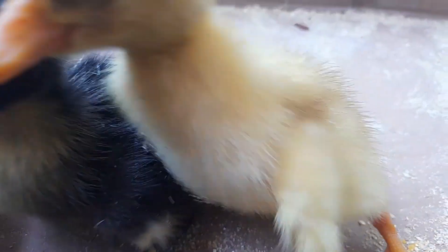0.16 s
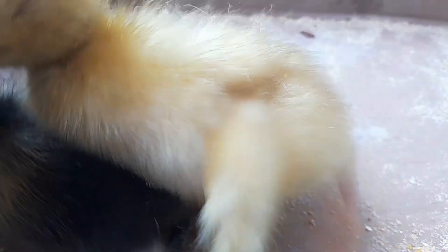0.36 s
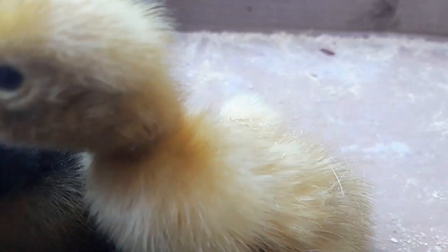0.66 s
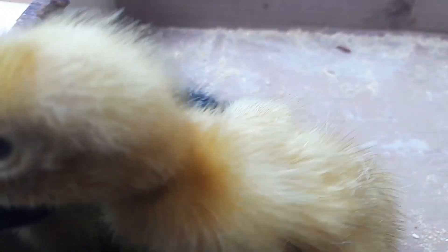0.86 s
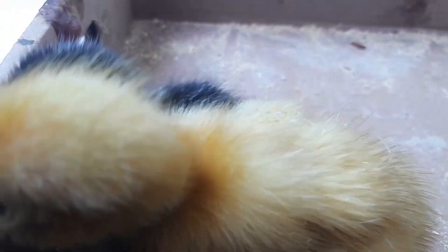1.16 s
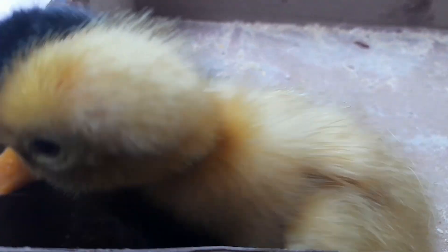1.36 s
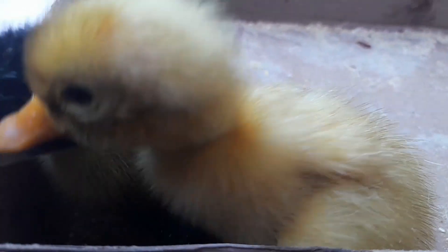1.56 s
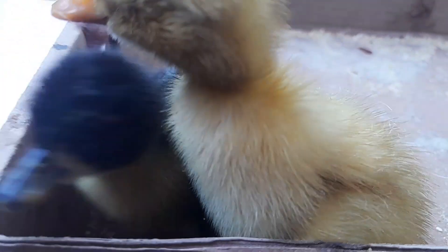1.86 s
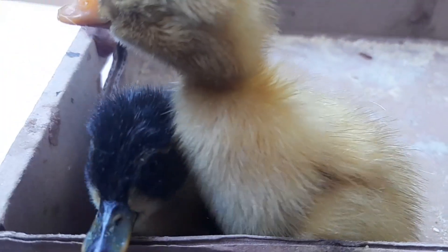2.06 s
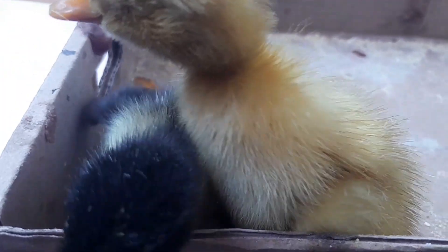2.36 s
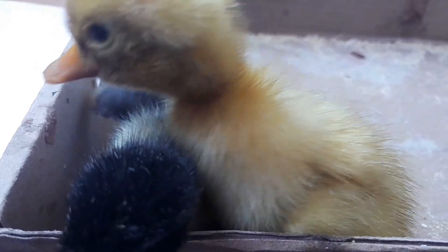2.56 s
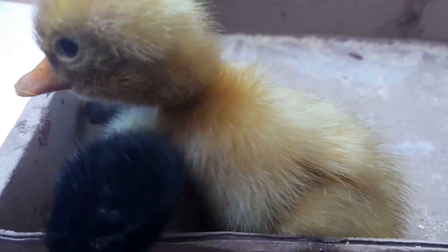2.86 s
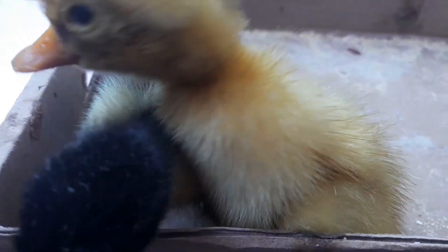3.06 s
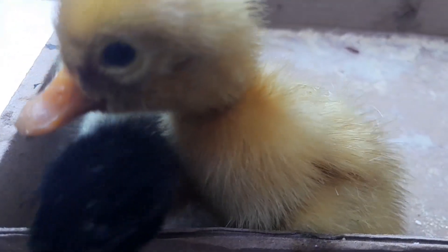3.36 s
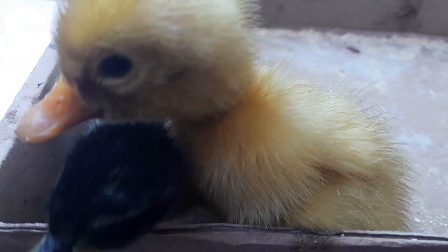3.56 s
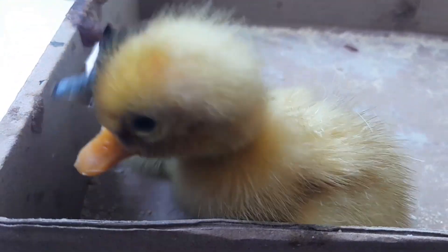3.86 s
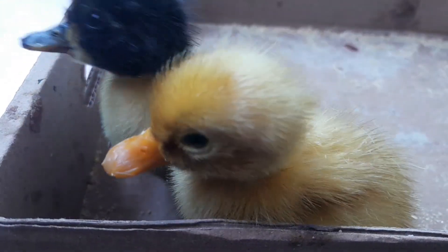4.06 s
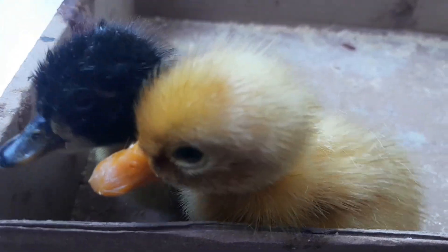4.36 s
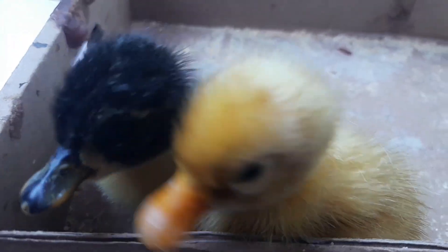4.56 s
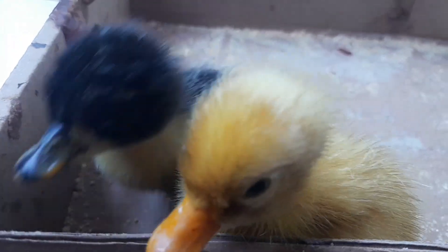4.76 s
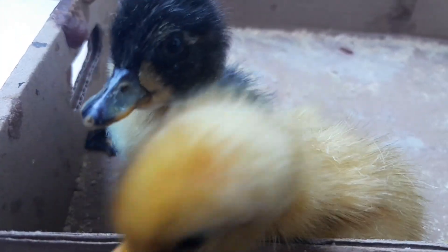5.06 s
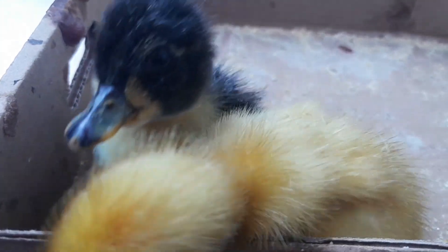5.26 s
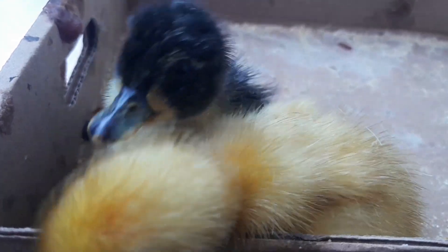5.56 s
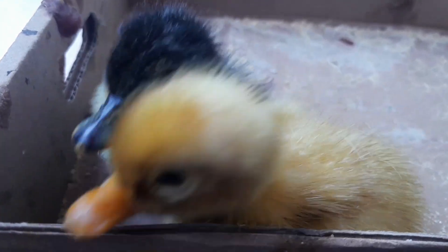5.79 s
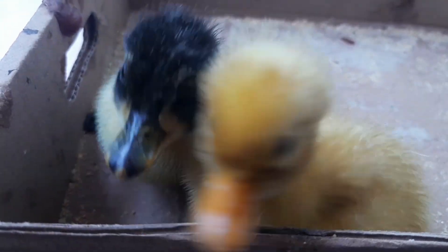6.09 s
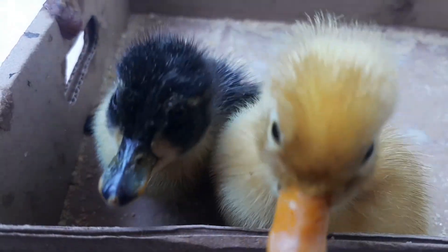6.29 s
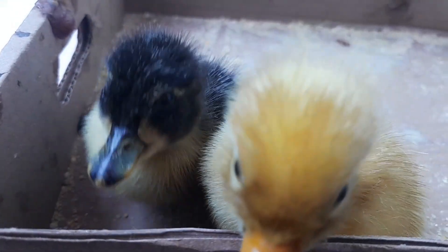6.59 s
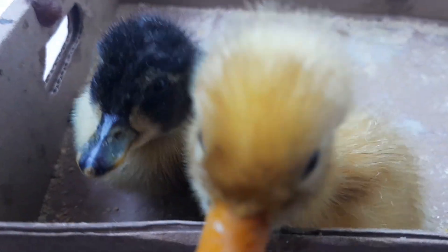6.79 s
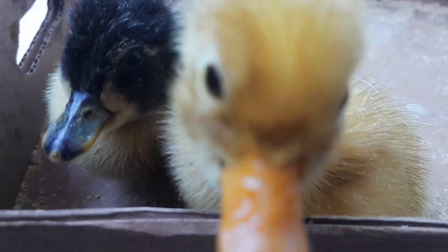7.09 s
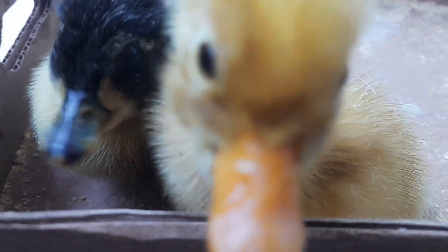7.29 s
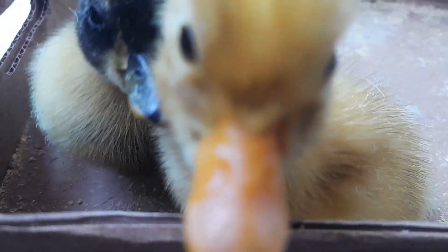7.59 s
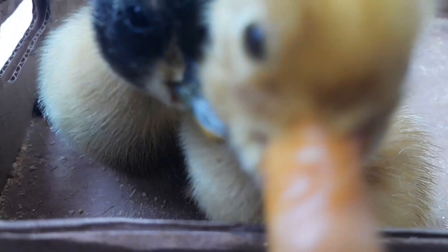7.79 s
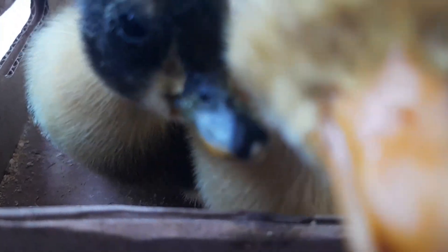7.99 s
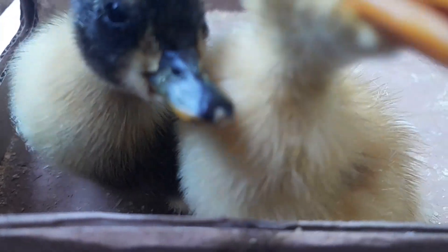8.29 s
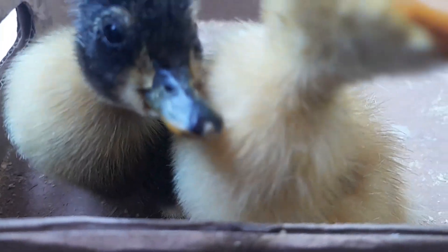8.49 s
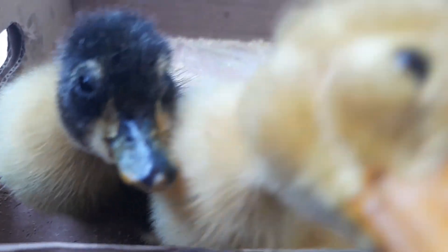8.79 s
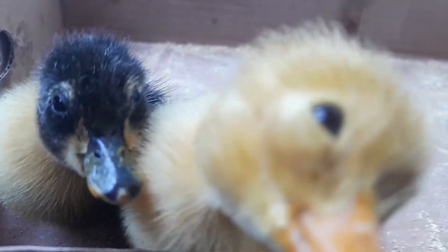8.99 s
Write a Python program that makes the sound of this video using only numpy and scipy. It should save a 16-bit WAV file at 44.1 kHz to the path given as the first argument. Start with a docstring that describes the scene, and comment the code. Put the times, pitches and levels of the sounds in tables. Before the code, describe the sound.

One sharp duckling peep, faint scuffs and taps on cardboard with a few soft peeps, then six loud peeps in a row.

```python
"""Two ducklings in a cardboard box, close to the left microphone, in a small, faintly humming room.
First comes one loud peep: the syrinx oscillates in a nearly pure tone while turbulent air adds a rasp.
For the next six seconds feet and down scuff the cardboard by friction, footfalls excite the modes of
the floor, and a few soft peeps sound, mostly falling. From 6.7 s a run of six loud, raspy peeps ends
the scene. Each call is followed by early reflections from the box walls, then by the room's decay."""
import sys
import numpy as np
from scipy import signal
from scipy.fft import rfft, irfft, next_fast_len
from scipy.io import wavfile
from scipy.ndimage import uniform_filter1d, minimum_filter1d, map_coordinates

SR = 44100
rng = np.random.default_rng(int(sys.argv[2]) if len(sys.argv) > 2 else 0)


def wrap_up_sound(samples):
    """Save the sound to the file named by the first command line argument, as 16-bit audio."""
    columns = np.atleast_2d(samples).T
    # keep every value between -1 and 1, then stretch to whole-number steps
    tamed = np.clip(columns, -1, 1)
    steps = np.round(tamed * 32767).astype(np.int16)
    wavfile.write(sys.argv[1], SR, steps)


N = 403074

# Levels in the tables are relative; each source adds its own gain.
# envelope of the room noise: time_s, level_db
AMBIENT_ENVELOPE = [(0, -71.5), (1.8, -65), (3.0, -65.5), (5.7, -64.5), (7.2, -66), (8.5, -74)]
# spectrum of the room's rumble: frequency_hz, density_db
RUMBLE_SPECTRUM = [(15, -54.5), (28, -21.5), (55, -5), (100, -2), (170, -1.5), (280, -7), (450, -7),
                   (640, -16), (750, -13.5), (1150, -23.5), (1600, -16), (2100, -31.5), (3200, -47),
                   (5000, -120)]
# steady tones in the room: frequency_hz, level_db
HUM_LINES = [(107.7, -72), (247.6, -68.5), (425.3, -69), (565.2, -73.5), (716.0, -77)]
# reverberation time of the room: frequency_hz, t60_s
ROOM_DECAY = [(200, 0.32), (5000, 0.19), (9000, 0.078), (15000, 0.051)]
# resonances of the box floor: frequency_hz, bandwidth_hz, level_db
FLOOR_MODES = [(91, 34, 2.5), (174.2, 5.7, 5.5), (263, 150, -2.5), (318.2, 97, 0.5), (473, 55, -9),
               (584, 220, -13), (770, 79, -7.5), (1020, 53, -8.5), (1562, 83, -12.5), (1990, 80, -8)]
# feet striking the floor: start_s, level_db, treble_limit_hz
FOOTFALLS = [(0.086, -60, 596), (.418, -49, 300), (0.464, -47, 250), (.519, -48, 400), (0.697, -50, 400),
             (.975, -47.5, 150), (1.048, -54, 500), (1.312, -39, 1170), (1.639, -49.5, 300),
             (1.912, -49, 400), (1.989, -45.5, 250), (2.14, -45.5, 600), (2.948, -47.5, 2500),
             (4.627, -38.5, 1500), (5.72, -47.5, 200), (7.289, -50, 900)]
# spectrum of friction on cardboard: frequency_hz, density_db
FRICTION_SPECTRUM = [(290, -33), (500, -8), (739, -0.5), (917, -7.5), (1010, -4.5), (1890, -5.5),
                     (2090, -4), (3470, -5), (3830, -8.5), (9390, -6), (11200, -10), (14700, -3),
                     (15800, -4)]
# down brushing the walls, busy at first and still at the end: time_s, level_db
SHUFFLE_ENVELOPE = [(.1, -56), (.34, -67.5), (1.4, -68), (1.8, -73), (2.55, -78), (3.02, -66.5),
                    (3.25, -73.5), (4.0, -75), (4.55, -68.5), (5.3, -71), (5.7, -68), (6.2, -81.5),
                    (6.7, -69.5), (7.9, -78), (8.55, -88)]
# feet sliding on the cardboard: crest_s, level_db, length_s, tilt_db_per_octave
SCUFF_STROKES = [(0.4, -38, .13, 3), (0.506, -39.5, 0.26, 0.5), (0.582, -47.5, 0.24, -1.5),
                 (0.893, -48.5, 0.097, -0.5), (1.047, -44, 0.12, 0.5), (1.29, -40.5, 0.28, 1.5),
                 (1.341, -38.5, 0.28, -0.5), (1.458, -45.5, 0.14, 0), (1.599, -47.5, 0.22, 0.5),
                 (1.706, -48.5, 0.16, 0), (1.896, -33.5, .13, 1.5), (1.955, -49, 0.23, -2),
                 (2.034, -38, 0.15, 0), (2.131, -33, 0.14, 1.5), (2.191, -41, 0.16, 0.5),
                 (2.359, -51.5, 0.15, -1), (2.719, -56, .25, 0), (2.894, -38, 0.25, 1),
                 (2.954, -45, 0.32, -2.5), (3.1, -41, 0.12, -1), (3.623, -53, 0.62, -0.5),
                 (3.802, -50, 0.32, -1), (3.911, -47.5, 0.092, 4.5), (4.128, -52, 0.14, -1.5),
                 (4.2, -47, 0.14, -0.5), (4.295, -50.5, 0.34, 0), (4.43, -46.5, 0.16, 0),
                 (4.62, -36, 0.22, 1.5), (4.666, -43.5, 0.29, -1.5), (4.763, -43, 0.12, 3.5),
                 (5.002, -53, 0.13, -2.5), (5.099, -56, .13, -1), (5.573, -48.5, 0.11, 2.5),
                 (5.627, -49.5, 0.073, 0), (5.756, -51.5, 0.15, -2), (6.058, -59, .12, 0.5)]
# quiet calls: start_s, length_s, pitch_hz, fall_octaves, level_db, roughness
SOFT_PEEPS = [(1.59, 0.084, 3570, 0.0053, -71, 0.5), (1.938, .076, 3660, 0.013, -71, 0.3),
              (2.997, 0.088, 4440, 0.3, -52, 0.37), (3.254, 0.062, 5150, -0.2, -70.5, .6),
              (3.284, 0.096, 4740, 0.25, -47, 0.4), (5.395, 0.15, 3600, .1, -72, 0.65),
              (5.927, .076, 3460, 0, -75, 0), (6.415, .12, 4850, .24, -42.5, .42)]
# course of a soft peep: length_share, fall_share, level_db, roughness_factor
SOFT_CONTOUR = [(0, 0.39, -34, 1.7), (.18, 0, -1.5, 0.69), (.32, .2, -1.5, 0.81), (.44, .65, 3, 0.47),
                (.58, 1.026, -1, 0.63), (.78, 1, 0, 1), (.88, 1.33, -7, 1.85), (1, 2.58, -29, 3.6)]
# spectrum of turbulent air in the throat and bill: frequency_hz, density_db
RASP_SPECTRUM = [(500, -45), (1100, -33), (1950, -17), (2700, -18.5), (3600, -16), (4600, -3.5),
                 (5500, -2.5), (6800, -5), (8500, -16.5), (10100, -11.5), (11500, -32), (13500, -19),
                 (15500, -15.5)]
# course of a loud peep: stage (0 start, 1 lock, 2 crack, 3 drop, 4 end), pitch_octaves, roughness_factor
LOUD_CONTOUR = [(0, -.6, 38), (.3, -.35, 30), (.48, .04, 2.4), (.93, .015, 1.6), (1.06, 0, .5),
                (1.95, 0, .65), (2.1, 0, 2.2), (3, 0, 2.4), (3.3, -.07, 9), (4, -.14, 24)]
# loud calls: start_s, lock_s, crest_s, crack_s, end_s, pitch_hz, glide_octaves,
# overtone_db, roughness, whistle_db, sag_db, rasp_db
LOUD_PEEPS = [(.050, .079, .128, .145, .186, 5040, -.08, -26, .14, -17, 13, -53),
              (6.655, 6.699, 6.742, 6.768, 6.798, 5060, -.05, -15, .14, -19.5, 7, -38),
              (6.908, 6.949, 6.965, 7.026, 7.056, 5130, -.045, -19, .17, -14.5, 6, -36),
              (7.190, 7.227, 7.258, 7.288, 7.340, 5280, 0, -24, .16, -19, 7, -36),
              (7.460, 7.499, 7.535, 7.582, 7.618, 5420, .05, -31, .22, -14.5, 7, -36),
              (7.740, 7.783, 7.795, 7.823, 7.897, 5480, .08, -40, .15, -12.5, 18, -39),
              (8.022, 8.054, 8.060, 8.066, 8.172, 5390, .1, -34, .27, -21.5, 2, -40.5)]

DROP_S, LOCK_S = .025, .003  # a loud peep's final drop; half the time its tone takes to lock


def amp(db):
    """Decibels as an amplitude ratio."""
    return 10 ** (np.asarray(db) / 20)


def unit(x):
    """Normalisation to an rms of 1."""
    return x / np.sqrt(np.mean(np.abs(x) ** 2) + 1e-20)


def along(points, hz):
    """Interpolation of (frequency_hz, value) points on a logarithmic frequency axis."""
    knots_hz, values = np.transpose(points)
    return np.interp(np.log(hz + 1), np.log(knots_hz + 1), values)


def curves(rows, at):
    """Linear interpolation of each later column against the first."""
    knots, *columns = np.transpose(rows)
    return [np.interp(at, knots, column) for column in columns]


def ramp(t, zero, one):
    """Linear transition from 0 to 1 between two times, held outside them."""
    return np.clip((t - zero) / (one - zero), 0, 1)


def wobble(rate, size):
    """Random modulation: a smooth curve of rms 1 with rate knots a second."""
    knots = rng.standard_normal(int(size * rate / SR) + 4)
    return unit(map_coordinates(knots, [np.arange(size) * rate / SR]))


def filtered(x, response):
    """Linear filtering: the spectrum is multiplied by a complex frequency response."""
    size = next_fast_len(x.shape[-1] + SR // 4)
    return irfft(rfft(x, size) * response(np.fft.rfftfreq(size, 1 / SR)), size)[..., :x.shape[-1]]


def noise(spectrum, shape):
    """Spectral shaping of white noise, at an rms of 1."""
    return unit(filtered(rng.standard_normal(shape), lambda hz: amp(along(spectrum, hz))))


def spread(pair, correlation, left_db):
    """Partial coherence: two independent signals mix as mid and side into left and right."""
    turn = np.arccos(correlation) / 2
    mid, side = np.cos(turn) * pair[0], np.sin(turn) * pair[1]
    return np.array([mid + side, mid - side]) * amp([[left_db / 2], [-left_db / 2]])


def add(track, start_s, x):
    """Superposition of x on the track from start_s."""
    part = track[..., max(round(start_s * SR), 0):][..., :x.shape[-1]]
    part += x[..., :part.shape[-1]]


def background():
    """Ambient noise: a continuous low spectrum plus wavering hum lines that follow its level."""
    t = np.arange(N) / SR
    air_db, = curves(AMBIENT_ENVELOPE, t)
    hum = np.zeros((2, N))
    for side in hum:
        for hz, db in HUM_LINES:
            side += amp(db + 3 * wobble(8, N)) * np.sin(2 * np.pi * hz * t + 1.1 * wobble(12, N))
    rumble = amp(air_db + 1 + 1.5 * wobble(14, N)) * noise(RUMBLE_SPECTRUM, (2, N))
    drone = amp(air_db - np.median(air_db)) * hum
    return spread(rumble + drone, correlation=0, left_db=2.8)


def room(x):
    """Reverberation: a diffuse tail decays exponentially, faster at high frequencies."""
    hz, t, spectra = signal.stft(rng.standard_normal((2, SR // 2)), SR, nperseg=256)
    decay = amp(-60 * t / along(ROOM_DECAY, hz)[:, None])
    tail = signal.istft(spectra * decay, SR, nperseg=256)[1]
    return signal.fftconvolve(x[None], tail / np.linalg.norm(tail[0]), axes=1)[:, :N]


def box_walls(x, span_s, count=30):
    """Early reflections: a cluster of quick, fading echoes, different at each microphone."""
    echoes = np.zeros((2, SR // 20))
    for side in echoes:
        lateness = rng.uniform(0, 1, count)
        delay_s = .0006 + lateness * span_s
        side[(SR * delay_s).astype(int)] = rng.standard_normal(count) * np.exp(-lateness)
    echoes /= np.linalg.norm(echoes, axis=1, keepdims=True)
    return signal.fftconvolve(x[None], echoes, axes=1)[:, :N]


def patter(count=40, above_shuffle_db=15, scatter_db=3.5, treble_limit_hz=350):
    """Random impacts: light footfalls whose level follows the shuffling, as rows like FOOTFALLS."""
    times = rng.uniform(0, N / SR, count)
    shuffle_db, = curves(SHUFFLE_ENVELOPE, times)
    levels = shuffle_db + above_shuffle_db + scatter_db * rng.standard_normal(count)
    return [(start_s, db, treble_limit_hz) for start_s, db in zip(times, levels)]


def floor_response(hz):
    """Modal superposition: the box floor responds as a sum of damped resonators of alternating sign."""
    return unit(sum((-1) ** k * amp(db) * 1j * hz * width / (centre ** 2 - hz ** 2 + 1j * hz * width)
                    for k, (centre, width, db) in enumerate(FLOOR_MODES)))


def footsteps(rise_s=.0034, t60_s=.28, radiation_hz=70):
    """Forced vibration: soft feet drive the small floor, which radiates little below radiation_hz."""
    push, t = np.zeros((2, N)), np.arange(SR // 4) / SR
    envelope = (1 - np.exp(-t / rise_s)) * amp(-60 * t / t60_s)
    for start_s, db, limit_hz in FOOTFALLS + patter():
        load = envelope * rng.standard_normal((2, len(t)))
        passband = lambda hz: 1j * hz / (radiation_hz + 1j * hz) / (1 + 1j * hz / limit_hz)
        add(push, start_s, amp(db - 1.5) * filtered(load, passband))
    return spread(filtered(push, floor_response), correlation=.3, left_db=1.5)


def friction(envelope, grain_db, tilt_db=0):
    """Friction noise: cardboard fibres break a hiss into grains, heard directly and by reflection."""
    size = len(envelope)
    hiss = noise([(hz, db + tilt_db * np.log2(hz)) for hz, db in FRICTION_SPECTRUM], size)
    grains = envelope * unit(amp(grain_db * wobble(800, size)) * hiss)
    reflected = box_walls(grains, span_s=.012)[:, :size]
    return grains * amp([[1.8], [-6]]) + reflected * amp([[-5.5], [-3.5]])


def scuffs(rise_share=.36, range_db=50, fidget_db=2.8):
    """Sliding friction: webbed feet make short, swelling strokes over an uneven brushing of down."""
    shuffle_db, = curves(SHUFFLE_ENVELOPE, np.arange(N) / SR)
    out = friction(amp(shuffle_db + 1 + fidget_db * wobble(24, N)), grain_db=3.5)
    for crest_s, db, length_s, tilt_db in SCUFF_STROKES:
        slack = np.interp(np.linspace(0, 1, int(length_s * SR)), [0, rise_share, 1], [1, 0, 1])
        envelope = amp(db - 8 - range_db * slack ** 1.22)
        add(out, crest_s - rise_share * length_s, friction(envelope, grain_db=2.5, tilt_db=tilt_db))
    return out


def syrinx(pitch_hz, roughness, second_db, third_db, beat_hz):
    """Modulation of an oscillator: as roughness grows, a nearly pure tone widens into a noise band."""
    size = len(pitch_hz)
    phase = 2 * np.pi * np.cumsum(pitch_hz * (1 + .004 * wobble(300, size))) / SR
    flutter = lambda rate: unit(wobble(rate, size) + 1j * wobble(rate, size))
    # the second side of the syrinx sounds a little higher and beats against the first
    twin = np.minimum(1.1 * roughness, .45)
    beat = np.exp(2j * np.pi * np.cumsum(beat_hz * (1 + .35 * wobble(50, size))) / SR)
    shake, fray = .8 * roughness, .8 * roughness ** 2
    modulation = 1 + twin * beat + shake * flutter(480) + fray * flutter(2000)
    strength = np.abs(modulation) / np.sqrt(1 + twin ** 2 + shake ** 2 + fray ** 2)
    phase += np.angle(modulation)
    overtones = amp(second_db) * np.sin(2 * phase) + amp(third_db) * np.sin(3 * phase)
    return np.sqrt(2) * strength * (np.sin(phase) + overtones / (1 + roughness ** 2))


def soft_peeps():
    """Frequency glides: most contented peeps step down in pitch, hold, and end in a rough flick."""
    out = np.zeros(N)
    for start_s, length_s, pitch_hz, fall_octaves, db, roughness in SOFT_PEEPS:
        fall_share, shape_db, hoarse = curves(SOFT_CONTOUR, np.linspace(0, 1, int(length_s * SR)))
        hz = pitch_hz * 2 ** (-fall_octaves * fall_share)
        voice = syrinx(hz, roughness * hoarse, second_db=-18, third_db=-31, beat_hz=400)
        add(out, start_s, amp(db + shape_db) * voice)
    return out


def peep_envelopes(t, start, lock, crest, crack, end, sag_db, swell_db_per_s=150.5):
    """Amplitude envelopes, in dB, of a loud peep's whistle and rasp: attack, swell, sag and release."""
    onset, release = ramp(t, lock, start), ramp(t, end - DROP_S, end)
    unlocked = ramp(t, lock + LOCK_S, lock - LOCK_S)  # both levels jump as the tone locks
    swell_db = swell_db_per_s * (np.clip(t, lock, crest) - crest)
    hold_db = swell_db - sag_db * ramp(t, crest, end - DROP_S) ** 1.3
    waver_db = 1.2 * wobble(70, len(t))
    whistle_db = hold_db + waver_db - 30 * onset ** 1.6 - 12.5 * unlocked - 25 * release ** 1.3
    arch_db = 10 * (2 * (ramp(t, start, end) - .61)) ** 2  # the rasp crests just past mid-call
    clearing = ramp(t, lock, crest) * ramp(t, crack + LOCK_S, crack - LOCK_S)  # it yields to the tone
    rasp_db = -19.5 * onset - 4.5 * unlocked - arch_db - 1.5 * clearing - 15.5 * release
    return whistle_db, rasp_db


def loud_peeps(grain_db=2.0):
    """Oscillation with turbulence: each peep leaps up, locks into a tone, turns hoarse and drops."""
    tone, rasp = np.zeros(N), np.zeros(N)
    for (start, lock, crest, crack, end, pitch_hz, glide_octaves,
         overtone_db, roughness, whistle_db, sag_db, rasp_db) in LOUD_PEEPS:
        t = np.arange(int(start * SR), int(end * SR)) / SR
        stage = np.interp(t, [start, lock, crack, end - DROP_S, end], np.arange(5))
        octaves, hoarse = curves(LOUD_CONTOUR, stage)
        whistle_shape_db, rasp_shape_db = peep_envelopes(t, start, lock, crest, crack, end, sag_db)
        edges = signal.windows.tukey(len(t), .08)
        hz = pitch_hz * 2 ** (octaves + glide_octaves * np.linspace(-.5, .5, len(t)))
        quiver_db = 1.4 * wobble(170, len(t))  # the air stream shakes tone and rasp together
        voice = syrinx(hz, roughness * hoarse, overtone_db, overtone_db, beat_hz=238.8)
        turbulence = unit(noise(RASP_SPECTRUM, len(t)) * amp(grain_db * wobble(600, len(t))))
        add(tone, start, edges * amp(whistle_db + whistle_shape_db + quiver_db) * voice)
        add(rasp, start, edges * amp(rasp_db + 8.5 + rasp_shape_db + quiver_db) * turbulence)
    return tone, rasp


def scene():
    """Directivity: the bills point at the left microphone; the right one hears mostly reflections."""
    tone, rasp = loud_peeps()
    tone += soft_peeps()
    direct = tone * amp([[5.5], [-24]]) + rasp * amp([[2], [-24]])
    tone_echoes = box_walls(tone, span_s=.004) * amp([[-14], [-12]])
    rasp_echoes = box_walls(rasp, span_s=.008) * amp([[2], [-8.5]])
    reverb = room(amp(-22.5) * tone + amp(-30) * rasp)
    return direct + tone_echoes + rasp_echoes + reverb + scuffs() + footsteps() + background()


def record(dry, ceiling=.8, hold_s=.006, cutoff_hz=15900):
    """Peak and band limiting: the gain dips at the loudest peaks, then a steep low-pass follows."""
    size = int(hold_s * SR)
    needed_gain = ceiling / np.maximum(np.abs(dry).max(axis=0), ceiling)
    gain = uniform_filter1d(minimum_filter1d(needed_gain, size), size)
    return filtered(gain * dry, lambda hz: 1 / (1 + (hz / cutoff_hz) ** 300))


dry = scene()
out = record(dry)
wrap_up_sound(out)
```